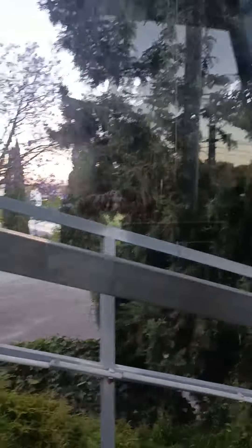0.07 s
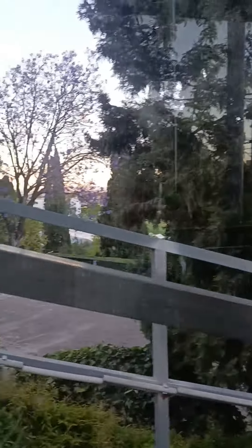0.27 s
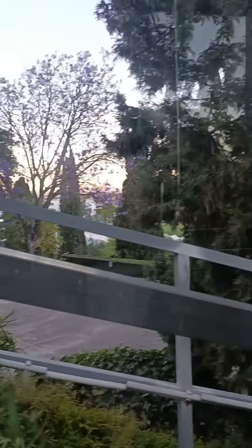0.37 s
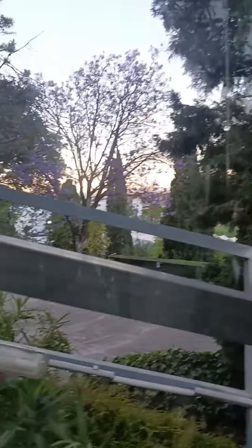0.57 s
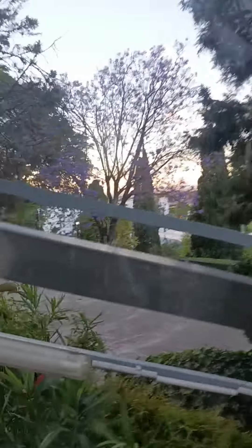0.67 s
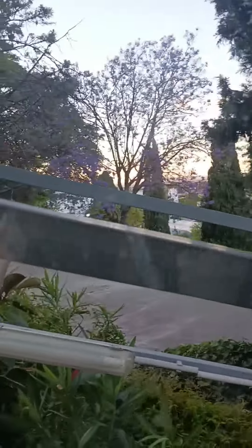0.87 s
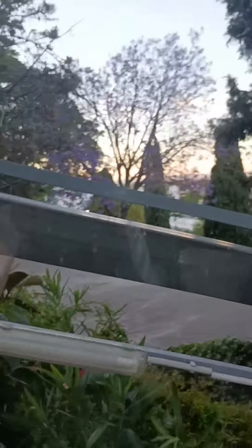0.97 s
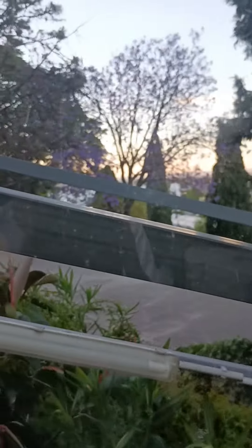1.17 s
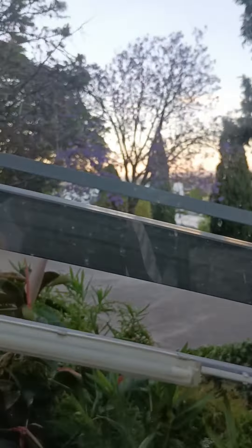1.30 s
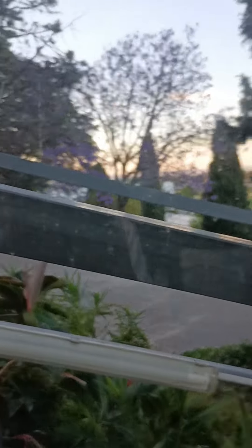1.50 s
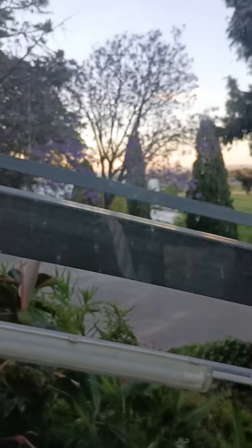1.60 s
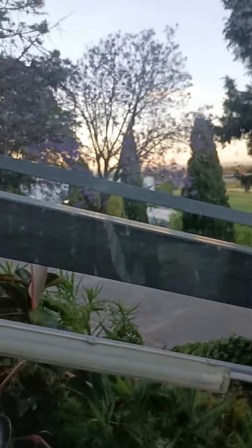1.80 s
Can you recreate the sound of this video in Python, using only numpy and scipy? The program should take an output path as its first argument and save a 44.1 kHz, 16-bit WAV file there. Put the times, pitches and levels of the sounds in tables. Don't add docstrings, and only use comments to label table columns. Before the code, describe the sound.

A sharp, bright latch clack rings early in a small metal and glass funicular cabin, after a loose rattle and panel groan; snaps, ticks and soft knocks follow over quiet lumpy rumble and hiss, heard close.

```python
import sys
import numpy as np
from scipy import signal
from scipy.fft import rfft, irfft
from scipy.io import wavfile
from scipy.ndimage import uniform_filter1d

SR = 44100
rng = np.random.default_rng(int(sys.argv[2]) if len(sys.argv) > 2 else 0)


def file_out(sig):
    cols = np.atleast_2d(sig).T
    lim = np.clip(cols, -1, 1)
    pcm = np.round(lim * 32767).astype(np.int16)
    wavfile.write(sys.argv[1], SR, pcm)


def volts(x):
    e = np.asarray(x, float) / 20
    return 10 ** e


N = 81585
MIC_PEAK_HZ = 15300


def unit(x):
    return x / np.sqrt(np.mean(x ** 2))


def colour(x, points):
    p = np.array(points)
    f = np.maximum(np.arange(4097) * SR / 8192, 1)
    log_gain = np.interp(np.log(f), np.log(p[:, 0]), p[:, 1]) * np.log(10) / 20
    cepstrum = irfft(log_gain)
    cepstrum[1:4096] *= 2
    cepstrum[4097:] = 0
    response = irfft(np.exp(rfft(cepstrum)))
    return signal.fftconvolve(x, response)[:len(x)]


def band(x, hz, width_hz):
    b, a = signal.iirpeak(min(hz, SR / 2.2), max(hz / width_hz, .3), SR)
    return signal.lfilter(b, a, signal.lfilter(b, a, x))


def mode(x, hz, t60):
    decay = np.log(1000) / (max(t60, .005) * SR)
    return signal.lfilter([1], [1, -np.exp(2j * np.pi * hz / SR - decay)], x).imag


def fade(t, hold, t60):
    knee = hold / 4 + 1e-4
    return (t >= 0) * volts(-60 / t60 * knee * np.logaddexp(0, (t - hold) / knee))


def walk(rate):
    k = int(SR / rate)
    steps = np.repeat(rng.standard_normal(N // k + 1), k)
    return unit(uniform_filter1d(uniform_filter1d(steps, k), k // 2)[:N])


def curve(rows):
    return volts(np.interp(np.arange(N) / SR, *np.array(rows).T))


def grainy(n, size):
    jumps = np.repeat(rng.standard_normal((n, size // 60 + 1)), 60, axis=1)
    jumps = uniform_filter1d(jumps, 30, axis=1)[:, :size]
    return rng.standard_normal((n, size)) * volts(1.5 * jumps)


# [t/s, level/dB]
RUMBLE_LEVEL = [(0, -56.5), (.15, -67), (.5, -64), (.75, -65), (1., -62), (1.3, -59.5), (1.55, -62),
                (1.85, -60)]
# [f/Hz, level/dB]
RUMBLE_COLOUR = [(26, -44), (45, -9.5), (67, -4), (145, -1.5), (244, -9.5), (448, -15), (504, -21),
                 (600, -23.5), (780, -51), (1320, -120)]


def rumble():
    lumps = volts(1.5 * walk(11.96))
    return curve(RUMBLE_LEVEL) * unit(colour(rng.standard_normal(N), RUMBLE_COLOUR) * lumps)


# [t/s, level/dB]
HISS_LEVEL = [(0, -60.5), (.1, -66.5), (.2, -66), (.4, -71), (.6, -61.5), (.8, -67), (1., -67), (1.15, -65),
              (1.28, -69), (1.35, -63), (1.45, -63), (1.58, -64.5), (1.85, -65.5)]
# [f/Hz, level/dB]
HISS_COLOUR = [(350, -13), (500, -6), (1000, -6), (7000, -9), (8400, -24.5), (12500, -38), (14000, -48),
               (15200, -30)]


def hiss():
    hits = rng.random(N) < 250 / SR
    grit = hits * volts(np.minimum(3 * rng.exponential(size=N), 6))
    tail = rng.standard_normal(600) * volts(-60 * np.arange(600) / SR / .015)
    rattle = unit(signal.fftconvolve(grit, tail)[:N])
    air = rng.standard_normal(N) * volts(1.5 * walk(12.9)) + volts(-7) * rattle
    self_noise = volts(-91) * unit(band(rng.standard_normal(N), MIC_PEAK_HZ, 2240))
    return curve(HISS_LEVEL) * unit(colour(air, HISS_COLOUR)) + self_noise


# [t/s, level/dB, f/Hz, 60 dB decay/s]
PINGS = [(.0085, -52, 2200, .03), (.038, -47, 8200, .04), (.436, -58, 11000, .04), (.2105, -50, 3050, .03),
         (.696, -49, 2070, .1), (.6945, -50, 5900, .04), (.4345, -38.5, 6160, 0.047),
         (0.434, -45, 2705, .05), (.436, -46.5, 1570, 0.033), (0.5418, -47, 6850, .08),
         (1.3785, -55, 3990, 0.056), (1.7376, -34, 5030, 0.02), (1.738, -38.5, 4000, .02),
         (1.7396, -47, 6000, .03), (1.7395, -52.5, 8100, .04), (1.7397, -55, 9490, .04)]


def pings():
    out = np.zeros(N)
    for s, db, hz, t60 in PINGS:
        age = np.maximum(np.arange(N) / SR - s, 0)
        shape = volts(db - 60 * age / t60) * np.clip(age / 0.00051, 0, 1)
        out += shape * np.sin(2 * np.pi * hz * age)
    return out


# [t/s, level/dB, f/Hz, push length/s, roughness from 0 to 1]
KNOCKS = [(.009, -59, 850, 0.018, 1.2), (.04, -57, 440, 0.059, 0.69), (0.0169, -56, 150, 0.019, 0.6),
          (.301, -62, 185, 0.021, 0.41), (0.406, -57, 320, 0.043, 0.79), (.825, -58, 317, 0.019, 0.71),
          (1.08, -60, 160, 0.02, 0.4), (1.099, -53.5, 364, 0.04, 0.54), (1.07, -62, 621, 0.071, 0.49),
          (1.346, -66, 1000, 0.15, 0.56), (1.44, -50.5, 147.3, 0.016, 0.2),
          (1.605, -53, 148.7, 0.033, 0.13), (1.64, -58, 330, 0.02, 0.4), (1.765, -55, 1647, 0.011, 0.5),
          (1.83, -57, 160, 0.016, 0.3), (1.02, -60, 80, .05, .3), (1.32, -57, 125, .04, .3),
          (1.63, -55, 90, .03, .3), (1.72, -55, 163, .05, .3), (.83, -60, 95, .03, .3)]


def knocks():
    t = np.arange(N) / SR
    out = np.zeros(N)
    for (s, db, hz, push_s, rough), noise in zip(KNOCKS, rng.standard_normal((len(KNOCKS), N))):
        rough = np.clip(rough, .05, 1)
        shape = np.clip((t - s) / 0.0047, 0, 1) * fade(t - s, push_s, 0.14)
        tone = np.sqrt(2) * np.sin(2 * np.pi * hz * (t - s))
        blur = unit(band(noise, hz, hz * rough ** 2))
        out += volts(db) * shape * ((1 - rough) * tone + rough * blur)
    return out


# [t/s, level/dB, f/Hz, length/s, starting pitch as a ratio]
GROANS = [
    (0.023, -49, 326, .122, 1.3),
    (1.069, -54, 448.4, 0.098, 0.85),
    (.415, -54, 190, .04, 1.15),
]


def groans():
    out = np.zeros(N)
    for s, db, hz, length, ratio in GROANS:
        age = np.maximum(np.arange(N) / SR - s, 0)
        slide = (ratio - 1) * np.exp(-age / .012)
        pitch = hz * (1 + slide + .012 * walk(41))
        sag_db = -55 * age + 1.3 * walk(59.74)
        shape = np.clip(age / 0.015, 0, 1) * fade(age, length, 0.067) * volts(sag_db)
        out += volts(db + 3) * shape * np.sin(2 * np.pi * np.cumsum(pitch) / SR)
    return out


# [t/s, peak level/dB, top sparkle/dB, hold/s, first snap over the hold/dB]
SNAPS = [
    (0.0369, -32, -30, 0.029, -17),
    (0.4341, -32, -34, 0.021, -9),
    (0.5425, -39, -58, 0.035, 7),
    (0.6067, -37.5, -33, 0.02, -8),
    (0.6942, -33, -26, 0.038, -3.5),
    (0.8645, -37, -51, 0.023, -4),
    (1.609, -36.5, -46, 0.023, -14),
    (1.6694, -44, -26, 0.024, -2),
    (1.741, -37, -50, 0.022, -8),
]
# [f/Hz, width/Hz, level/dB]
FITTINGS = [
    [(1930, 1400, -3.5), (3380, 1180, -1), (4600, 1500, -9), (6600, 700, 1), (7480, 260, -5.5),
     (8400, 770, -9)],
    [(1190, 280, -10.5), (1570, 170, -11), (2070, 300, -10), (2710, 270, -4), (3960, 560, -5),
     (4500, 280, -8.5), (5020, 380, -2), (5570, 200, -16), (6210, 200, -4), (7800, 200, -23)],
    [(2850, 280, -11), (3900, 600, -12), (5000, 500, -8), (6850, 400, -4), (7700, 250, -12)],
    [(2770, 96, -6), (5100, 1600, 3.5)],
    [(2070, 300, -7.5), (3710, 340, -10.5), (4430, 130, -10.5), (5300, 1500, -2), (6530, 300, -13.5)],
    [(2240, 520, -4.5), (4150, 560, 5), (4720, 480, 4.5)],
    [(5200, 1670, -2), (1480, 1300, -8)],
    [(1680, 1900, 3.5), (5370, 1640, 3.5)],
    [(3400, 370, -4.5), (4000, 700, -3), (4950, 900, 3), (6000, 300, -2.5), (7430, 360, -9.5),
     (9630, 270, -21)],
]


def snaps():
    out, size = np.zeros(N + SR), SR // 4
    t = np.arange(size) / SR
    rise = np.clip(t / .0015, 0, 1)
    for (s, db, top_db, hold, first_db), peaks, noise in zip(SNAPS, FITTINGS, grainy(len(SNAPS), size)):
        first = volts(first_db) * fade(t, 0.0012, 0.021)
        long = noise * rise * (first + fade(t, hold, 0.13))
        short = noise * rise * (first + fade(t, hold / 2, 0.092))
        tone = sum(volts(g) * band(long, hz, width) * np.sqrt(SR / width) for hz, width, g in peaks)
        body = volts(-13.5) * 4 * colour(long, TICK_COLOUR)
        sparkle = band(short, MIC_PEAK_HZ, 1400) + 0.1 * band(short * fade(t, .004, .06), 11000, 3000)
        i = int((s - .002) * SR)
        out[i:i + size] += volts(db - 19.5) * (tone + body + volts(top_db + 26.5) * sparkle)
    return out[:N]


# [t/s, peak level/dB, main ring f/Hz, lower ring/dB, top sparkle/dB]
TICKS = [(0.13, -51, 4950, -14, -43), (0.164, -60, 5370, -26, -64), (0.5, -44.5, 4720, -9.5, -31),
         (0.8287, -48, 5200, -11.5, -19), (0.9396, -56.5, 3650, 2.5, -53), (1.1263, -60, 4940, -10, -33),
         (1.195, -58, 6000, -8, -25), (1.21, -59, 2780, -15, -50), (1.434, -56, 6960, -15, -40),
         (0.595, -50, 6800, -13, -30), (1.3313, -52, 6000, -10.5, -21), (1.3794, -44, 6150, -18, -55),
         (1.482, -46.5, 3720, -8.5, -45), (1.519, -55, 4500, -11, -20), (1.8344, -57.5, 5020, -26, -3.5)]
# [f/Hz, level/dB]
TICK_COLOUR = [(800, -35), (2500, -18), (4000, 8.5), (6000, 4.5), (7500, -3.5), (9000, -31.5), (12000, -33),
               (14000, -40)]


def ticks():
    out, size = np.zeros(N + SR), SR // 4
    t = np.arange(size) / SR
    tail = volts(-5.5) * fade(t, 0.011, 0.24)
    shape = np.clip(t / .0015, 0, 1) * (fade(t, 0.0042, .015) + tail)
    for (s, db, hz, low_db, top_db), noise in zip(TICKS, grainy(len(TICKS), size)):
        ring = unit(band(noise, hz, 660))
        body = volts(-2.5) * unit(colour(noise, TICK_COLOUR))
        low = volts(low_db + 1.5) * unit(band(noise, 1800, 1800))
        sparkle = unit(band(noise, MIC_PEAK_HZ, 1900) + band(noise, 9100, 4400) / 2)
        i = int((s - .002) * SR)
        out[i:i + size] += volts(db - 11.5) * (ring + body + low + volts(top_db + 5.5) * sparkle) * shape
    return out[:N]


# [t/s, level/dB]
CLACK_BLOWS = [(0.2212, -1), (0.2227, -1), (0.2244, -0.5), (0.228, -3), (0.2339, -1.5), (0.238, -3),
               (0.2553, -3.5), (0.259, -9), (0.268, -8), (0.2775, -9), (0.281, -14)]
# [f/Hz, level/dB]
CLACK_COLOUR = [(450, -76), (800, -17), (2000, -7.5), (3500, -0.5), (6030, 5.5), (8500, -10.5),
                (12500, -27.5), (15000, -13.5)]
CLACK_START_S, CLACK_HOLD_S = CLACK_BLOWS[0][0], 0.049


def scrape():
    t = np.arange(N) / SR
    shape = np.clip((t - 0.2125) / 0.0042, 0, 1) * (t < CLACK_START_S)
    return volts(-48) * shape * unit(band(rng.standard_normal(N), 4500, 6000))


def blows_in_cabin():
    t = np.arange(N) / SR
    age = t - CLACK_START_S
    noise = rng.standard_normal(N)
    echoes = rng.standard_normal(N) + grainy(1, N)[0] / 2
    bursts = sum(volts(db) * np.clip((t - s) / 0.00038, 0, 1) * volts(-60 * np.abs(t - s) / 0.012)
                 for s, db in CLACK_BLOWS)
    dull = signal.sosfilt(signal.butter(2, 8000, fs=SR, output="sos"), echoes)
    treble = echoes - dull
    cabin = dull * fade(age, CLACK_HOLD_S, 0.21) + treble * fade(age, CLACK_HOLD_S, .13)
    cabin = np.clip(age / 0.0074, 0, 1) * cabin
    gain = 1 / np.sqrt(np.mean(colour(noise, CLACK_COLOUR) ** 2))
    return gain * colour(cabin + volts(9.5) * noise * bursts, CLACK_COLOUR)


CLACK_MODE_HZ = [1852, 2449, 2772, 3229, 3566, 3940, 4607, 4885, 5170, 5221, 5413, 5870, 6027, 6270]
# [level/dB, 60 dB decay/s]
CLACK_MODES = [(-3.5, 0.21), (-12, 0.21), (-10, 0.47), (-4, 0.57), (-7, 0.4), (-1, 0.56), (-12, .3),
               (-4, .3), (-4, 0.53), (-4, .2), (-4, .3), (-8, .35), (-2, 0.24), (-5, 0.36)]


def latch_rings():
    t = np.arange(N) / SR
    age = np.maximum(t - CLACK_START_S, 0)
    rings = sum(volts(db + 3.2 * walk(40)) * fade(age, CLACK_HOLD_S, t60) * np.sin(2 * np.pi * hz * age)
                for hz, (db, t60) in zip(CLACK_MODE_HZ, CLACK_MODES))
    push = rng.standard_normal(N) * fade(t - CLACK_START_S, 0.024, 0.054)
    sheet = sum(volts(-12 * weak) * mode(push, 1500 + 6500 * place, .3 * (0.46 + decay / 2))
                for place, weak, decay in rng.random((70, 3)))
    sheet = colour(sheet, CLACK_COLOUR)
    both = rings * volts(-2) / np.max(np.abs(rings)) + sheet * volts(-3) / np.max(np.abs(sheet))
    return 2 * both * fade(age, .15, .15)


DOOR_HZ = [500, 547, 600, 650, 745]
# [level/dB, 60 dB decay/s]
DOOR_MODES = [(-46, 1.5), (-43, .9), (-38.5, .6), (-46, .5), (-44.5, .25)]


def door_panel():
    age = np.maximum(np.arange(N) / SR - CLACK_START_S, 0)
    hum = sum(volts(db - 60 * age / t60) * np.sin(2 * np.pi * hz * age)
              for hz, (db, t60) in zip(DOOR_HZ, DOOR_MODES))
    tail = volts(-57) * fade(age, .16, .2) * np.sin(2 * np.pi * 590 * age)
    hum = (hum * fade(age, .105, .12) + tail) * volts(0.41 * walk(43.7))
    rough = volts(-49) * fade(age, 0.042, 0.14) * unit(band(rng.standard_normal(N), 616, 150))
    return (hum + rough) * (1 - np.exp(-age / 0.004)) ** 2


def clack():
    return scrape() + volts(-25.5) * (blows_in_cabin() + latch_rings()) + door_panel()


def scene():
    running = rumble() + hiss()
    panels = knocks() + groans()
    metal = pings() + snaps() + ticks() + clack()
    return (running + panels + metal)[None]


def top_cut(x):
    return signal.sosfilt(signal.butter(12, 16960, fs=SR, output="sos"), x)


def record(dry):
    mix = signal.sosfilt(signal.butter(5, 62, "high", fs=SR, output="sos"), dry)
    mix = signal.sosfilt(signal.ellip(10, .2, 60, 15720, fs=SR, output="sos"), mix)
    return top_cut(mix)


dry = scene()
out = record(dry)
file_out(out)
```